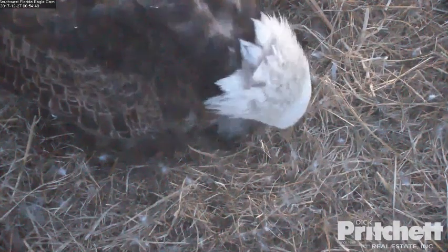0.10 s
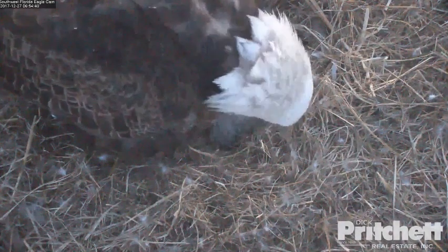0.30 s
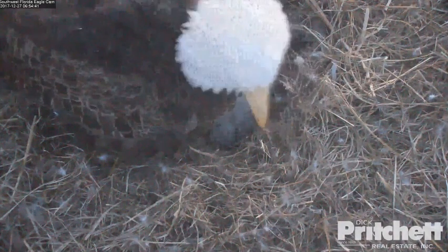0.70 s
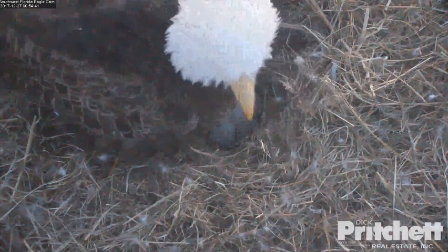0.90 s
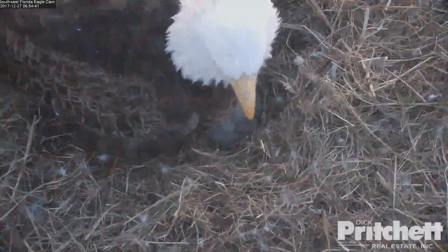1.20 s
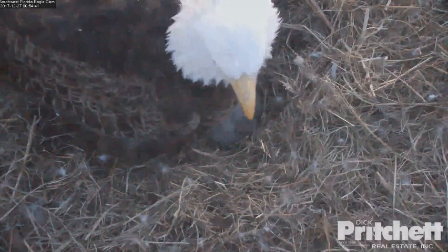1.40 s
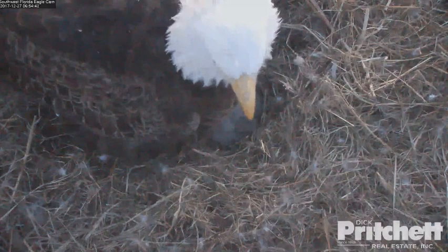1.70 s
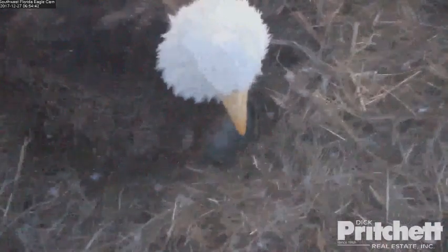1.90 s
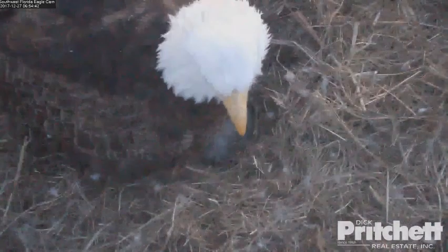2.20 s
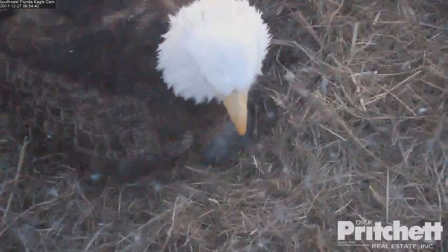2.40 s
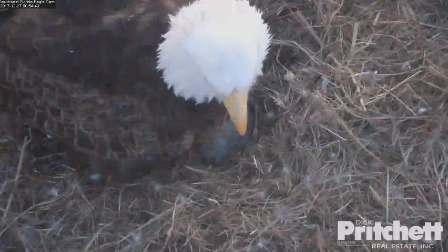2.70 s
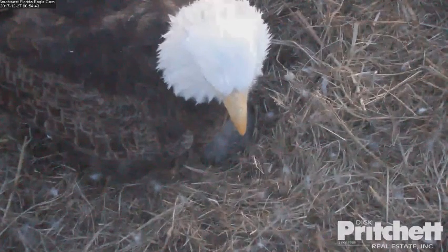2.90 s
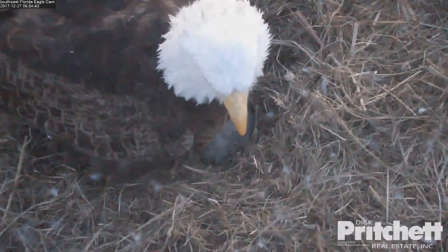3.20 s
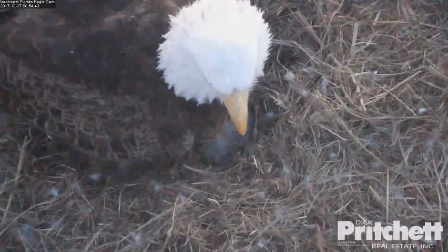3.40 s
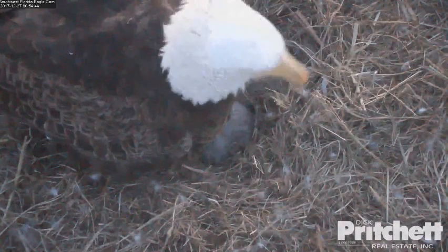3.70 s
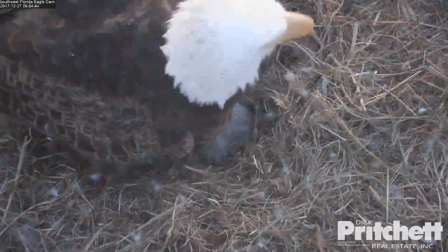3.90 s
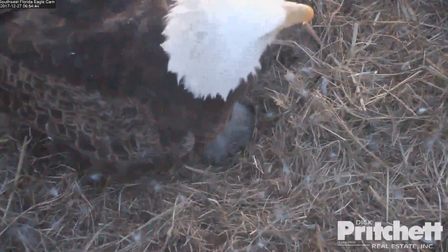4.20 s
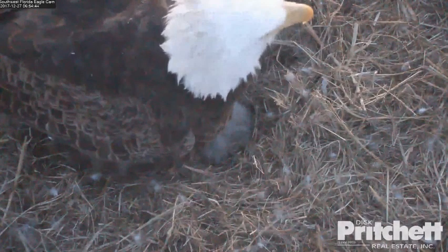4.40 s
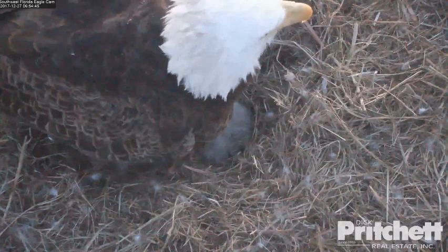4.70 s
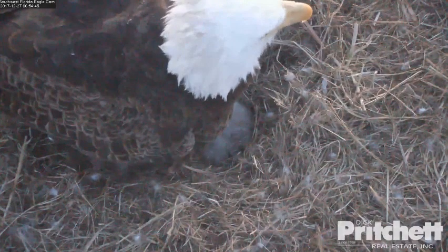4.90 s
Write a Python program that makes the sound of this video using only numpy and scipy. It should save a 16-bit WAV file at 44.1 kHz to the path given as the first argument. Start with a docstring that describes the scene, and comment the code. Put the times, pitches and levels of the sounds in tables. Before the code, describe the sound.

Outdoors, close dry crackling begins at once as a heavy bird turns in its straw bedding, loudest and slightly overloaded in the opening half second. After about one second it thins to separate ticks, creaks and snaps with short crackly tails and faint body thuds. Far traffic hisses softly throughout, with weak wavering engine tones. A cheap small microphone gives a nasal ring and little high treble.

```python
"""From the start an eagle shoves itself round on a nest of dry grass (random clicks ringing through
resonances), in bursts that are over soon after 1 s; soft thuds (low noise) come and go to the end.
Then it settles: stalks go on creaking and snapping (click bursts), and the bedding crackles as it leans.
Behind it all a far road hisses and roars (shaped noise); engines hum (wavering tones), one rising late.
The small camera microphone rings near 3 kHz, overloads on loud crackles and passes little above 8 kHz."""
import sys
import numpy as np
from scipy import signal
from scipy.fft import rfft, irfft
from scipy.io import wavfile
from scipy.ndimage import uniform_filter1d

SR = 44100
rng = np.random.default_rng(int(sys.argv[2]) if len(sys.argv) > 2 else 0)


def store_wav(level_fs):
    """Save 16-bit WAV to argv[1]."""
    pcm = np.round(np.clip(np.atleast_2d(level_fs), -1, 1) * 32767)
    wavfile.write(sys.argv[1], SR, pcm.T.astype(np.int16))


N = 220884
TIME = np.arange(N) / SR

# Spectrum of the road, shared by hiss and roar: f/Hz, relative level/dB
ROAD_SPECTRUM = [(20, -31), (60, -22), (300, -16.5), (450, -16), (650, -8), (1000, -12), (1190, -9.5),
                 (1370, 0), (1750, -1.5), (2230, -8), (2720, 1.5), (3250, -10.5), (4100, -24), (5100, -38),
                 (7500, -58)]
# Swell of the tyre hiss as traffic flows, before the trim in road(): t/s, level/dB
TRAFFIC_FLOW = [(0.35, -50), (0.75, -52), (1.38, -54.5), (1.92, -50.5), (2.5, -50.4), (2.95, -51),
                (3.4, -50.5), (4.2, -52), (4.7, -53), (5, -51.5)]
# Three far engines, before the trim in engine(): t/s, f/Hz (mean pitch), level/dB
LOW_ENGINE_CURVE = [(0.4, 102, -77.5), (0.82, 104.5, -76), (1.7, 96.1, -83), (2.65, 92.5, -77),
                    (2.95, 92.2, -96), (3.3, 91.7, -97), (3.6, 90.9, -78), (4.05, 89.6, -80.5)]
RISING_ENGINE_CURVE = [(2.75, 155.7, -86), (4.95, 172.2, -78)]
WHINE_CURVE = [(0.1, 332, -79), (0.65, 342.8, -81), (1.0, 344, -77), (1.8, 341.9, -74), (2.05, 349, -81.5),
               (2.9, 341.6, -75.5), (4.1, 338.3, -73), (4.4, 334.7, -80), (5, 341.7, -79.5)]
# Resonances of the camera housing, heard in every crackle: f/Hz, width/Hz, level/dB
HOUSING_RESONANCES = [(1450, 390, -8.5), (1780, 400, -8.5), (2628, 388, 1.5), (2878, 111, 2.5),
                      (2974, 43, 6.5), (3270, 46.7, 3), (3385, 220, -6.5), (3940, 207, -5.5),
                      (4140, 190, -7.5), (4760, 38, -22), (5700, 300, -42.5)]
# The nest gives under the bird's weight: t/s, half length/s, level/dB
WEIGHT_THUDS = [(0.168, 0.064, -79), (0.306, 0.024, -64.5), (1.616, 0.064, -74.5), (1.98, 0.057, -79),
                (2.678, 0.038, -70.5), (3.201, 0.076, -76.5), (4.57, 0.034, -69.5), (4.664, 0.037, -74.5)]
# The bird leans on the bedding: t/s, half length/s, crackle level/dB
BEDDING_LEANS = [(0.91, 0.043, -51), (1.7, 0.094, -48.5), (1.94, 0.037, -53.5), (2.42, 0.04, -61),
                 (2.645, 0.016, -53), (3.26, 0.07, -51), (4.95, 0.15, -57.5)]
# Single stalks break, before the trims in snaps(): t/s, level/dB, stalk ring f/Hz, brittle top level/dB
STALK_SNAPS = [(0.032, -39.5, 2800, -4), (0.086, -42.5, 2870, -10), (0.111, -39, 2750, -16),
               (0.265, -46.5, 2700, 3), (0.302, -47.5, 2600, -17), (0.485, -41.5, 2800, -15),
               (0.584, -59, 2880, -18), (0.625, -42, 2820, -16), (0.641, -47.5, 2620, 3),
               (0.832, -49, 2750, -7), (0.85, -47, 2800, -15), (1.057, -46, 2890, -19),
               (1.081, -44.5, 2650, -11), (1.198, -47.5, 2700, -21), (1.445, -48.5, 2700, -3),
               (1.597, -46.5, 2640, -1), (1.609, -49, 2700, 1.5), (1.76, -39, 2870, -3),
               (1.769, -48, 2740, 4.5), (1.786, -45.5, 2870, -24), (1.801, -48, 3070, -22),
               (2.118, -47.5, 2995, -10), (2.144, -44, 2860, -16), (2.15, -49, 2660, -13),
               (2.246, -47.5, 2970, -8.5), (2.375, -48, 2980, -11), (2.438, -55, 2980, -9),
               (2.494, -47, 2930, -5), (2.535, -50, 2760, -16), (2.605, -47.5, 2890, -17),
               (2.749, -49, 3000, 2), (2.891, -42, 2800, -14), (3.005, -41, 3130, -19),
               (3.136, -46.5, 2760, -3.5), (3.162, -50.5, 2510, 2.5), (3.37, -42.5, 3020, -9),
               (3.497, -44.3, 2580, -2), (3.506, -50, 3180, -12), (3.652, -44, 2500, -9),
               (3.663, -45.5, 2620, -3.5), (3.821, -46.5, 2560, -7.5), (3.849, -50, 3130, -10),
               (3.988, -43, 2420, -13), (4.014, -50, 2970, -24), (4.15, -52.5, 2900, 1),
               (4.362, -51, 2403, -5), (4.511, -44.5, 2740, -13.5)]
# The bird shoves itself round: peak t/s, rustle level/dB, crunch level/dB, build-up/(dB/s), decay/(dB/s)
BODY_SHOVES = [(0.189, -36.8, -49.5, 104, 194), (0.32, -35, -56, 400, 54.5),
               (0.495, -41.5, -58, 302, 100.5), (1.095, -48.5, -62, 151, 300)]

# The roar ebbs to its lowest level at the dip, rising evenly away from it on both sides
ROAR_DB, ROAR_DIP_S, ROAR_SWELL_DB_PER_S = -62.5, 1.8, 0.9
RESTING_DB = -64.5  # crackle under the bird's weight alone
LOOSENED_DB, SETTLE_S = -7, 0.075  # crackle after a snap: level against the snap's listed level, decay
# A snap of the reference level splinters this long; the time doubles with every further step in dB
SPLINTER_S, SPLINTER_DB, SPLINTER_DOUBLES_DB = 0.014, -48, 23
FAINT_COUNT, FAINT_DB, FAINT_RING_HZ = 16, -52.5, (2500, 2940)  # mean level, before the trim in snaps()
CRUNCH_DEPTH = 1.35  # the crunch swings this many dB per dB of rustle
OVERLOAD_DB, ELECTRONICS_DB = -34.3, -95  # microphone ceiling, noise floor before the last filter
CAMERA_RATE, CAMERA_TOP_HZ, CUTOFF_HZ = 16000, 7380, 15800  # sample rate in Hz, two low-pass corners


def from_db(db):
    """Decibels to gain."""
    return 10 ** (np.asarray(db) / 20)


def rms_one(x):
    """Scale to rms 1."""
    return x / np.sqrt(np.mean(x ** 2) + 1e-20)


def evened(x, size=SR // 40):
    """Hold rms near 1 over 25 ms, so the push of the body, not chance, sets the loudness."""
    return x / np.sqrt(uniform_filter1d(x ** 2, size) + 1e-9)


def in_time(rows):
    """Draw each column of a curve out to every sample."""
    s, *columns = np.transpose(rows)
    return [np.interp(TIME, s, column) for column in columns]


def during(rows):
    """Gain 1 while a curve lasts, with 0.1 s fades outside both ends."""
    first, last = rows[0][0], rows[-1][0]
    return np.interp(TIME, [first - .1, first, last, last + .1], [0, 1, 1, 0])


def swells(rows):
    """Gain of smooth bell-shaped pushes that come and go."""
    return sum(from_db(db) * np.exp(-.5 * ((TIME - s) / half) ** 2) for s, half, db in rows)


def cut(x, hz, kind, order=2):
    """Butterworth filter."""
    sos = signal.butter(order, hz, kind, fs=SR, output="sos")
    return signal.sosfilt(sos, x + 1e-18)


def drift(rate):
    """Slow random drift with rms 1: white noise that falls off above the rate in Hz."""
    hz = np.fft.rfftfreq(N, 1 / SR)
    spectrum = rfft(rng.standard_normal(N)) / (1 + (hz / rate) ** 2)
    return rms_one(irfft(spectrum, N))


def coloured_noise(spectrum):
    """Steady noise with a given spectrum, rms 1."""
    points_hz, db = np.transpose(spectrum)
    hz = np.maximum(np.fft.rfftfreq(N, 1 / SR), 1)
    colour = from_db(np.interp(np.log(hz), np.log(points_hz), db))
    return rms_one(irfft(rfft(rng.standard_normal(N)) * colour, N))


def resonate(x, hz, width):
    """One two-pole resonance with gain about 1 at its peak."""
    r = np.exp(-np.pi * width / SR)
    feed = np.array([1, 0, -1]) * (1 - r * r) / 2
    back = [1, -2 * r * np.cos(2 * np.pi * hz / SR), r * r]
    return signal.lfilter(feed, back, x + 1e-18)


def road(split_hz=1150, hiss_db=3.0, sway_db=0.4):
    """Far tyres: a hiss above and a duller roar below swell separately; the hiss flutters slightly."""
    hiss_level, = in_time(TRAFFIC_FLOW)
    roar_level = ROAR_DB + ROAR_SWELL_DB_PER_S * np.abs(TIME - ROAR_DIP_S)
    hiss = rms_one(cut(coloured_noise(ROAD_SPECTRUM), split_hz, "high", order=8))
    roar = rms_one(cut(coloured_noise(ROAD_SPECTRUM), split_hz, "low", order=8))
    hiss_gain = from_db(hiss_level + hiss_db + sway_db * drift(16))
    return hiss_gain * hiss + from_db(roar_level) * roar


def engine(rows, gain_db, octave_db, waver_db=1.3, wobble_hz=0.82):
    """A far engine tone and its octave, wavering on the way through the air."""
    hz, level_db = in_time(rows)
    phase = 2 * np.pi * np.cumsum(hz + wobble_hz * drift(4.8)) / SR
    tone = rms_one(np.sin(phase) + from_db(octave_db) * np.sin(2 * phase))
    gain = from_db(level_db + gain_db + waver_db * drift(5.8))
    return during(rows) * gain * tone


def thuds(low_hz=40, high_hz=150):
    """Soft pushes of the body carried through the nest: swells of low noise."""
    rumble = rms_one(cut(rng.standard_normal(N), [low_hz, high_hz], "band"))
    return swells(WEIGHT_THUDS) * rumble


def housing(clicks, top_hz):
    """Clicks ring in the camera housing; the deeper in the nest they start, the lower their top."""
    rings = 0
    for k, (hz, width, db) in enumerate(HOUSING_RESONANCES):
        rings = rings + (-1) ** k * from_db(db) * resonate(clicks, hz, width)  # alternating polarity
    return cut(rings, top_hz, "low", order=4)


def fractures(per_s, spread_db, size):
    """Tiny breaks at random moments and of either sign: many weak, a few strong."""
    born = rng.random(size) < per_s / SR
    sign = rng.choice([-1, 1], size)
    return born * sign * from_db(spread_db * np.minimum(rng.exponential(1, size), 4))


def unrest():
    """Gain of the bedding's crackle: the resting weight, the leans, the settling after listed snaps."""
    settling = 0
    for s, db, *_ in STALK_SNAPS:
        decay = np.exp(-np.abs(TIME - s) / SETTLE_S)
        settling = settling + (TIME >= s) * (from_db(db + LOOSENED_DB) * decay) ** 2
    return np.sqrt(from_db(RESTING_DB) ** 2 + swells(BEDDING_LEANS) ** 2 + settling)


def stir(top_hz=4250, slip_s=.018):
    """Muffled crackle of the bedding: each small slip starts at once and dies away."""
    slips = np.abs(fractures(per_s=32, spread_db=1.5, size=N))
    surge = .5 + signal.lfilter([1], [1, -np.exp(-1 / (slip_s * SR))], slips + 1e-18)
    # limit the surge, so that the crackle stays even and no random slip stands out
    clicks = np.tanh(surge / 1.8) * fractures(per_s=2000, spread_db=2.2, size=N)
    return unrest() * rms_one(cut(housing(clicks, top_hz), 1.4 * top_hz, "low"))


def faint_snaps(spread_db=2.0, top_db=-10):
    """More stalks give way weakly at random moments, in the columns of STALK_SNAPS."""
    return [(rng.uniform(0, N / SR), rng.normal(FAINT_DB, spread_db), rng.uniform(*FAINT_RING_HZ), top_db)
            for _ in range(FAINT_COUNT)]


def snaps(top_hz=4350, stalk_width=130, stalk_db=4, brittle_hz=3500, brittle_db=-2,
          scatter_db=-18, scatter_s=0.06, gain_db=-1.35):
    """A stalk cracks and splinters for milliseconds; the sticks around scatter a short tail."""
    size, head = SR // 6, SR // 100  # whole snap, and the first 10 ms that set its level
    age, out = np.arange(size) / SR, np.zeros(N + size)
    for s, level_db, stalk_hz, bright_db in STALK_SNAPS + faint_snaps():
        lasts = SPLINTER_S * 2 ** ((level_db - SPLINTER_DB) / SPLINTER_DOUBLES_DB)
        clicks = fractures(per_s=3000, spread_db=2.0, size=size)
        clicks *= np.exp(-age / lasts) + from_db(scatter_db) * np.exp(-age / scatter_s)
        clicks[0] = 7.0  # the first break is by far the strongest
        stalk = from_db(stalk_db) * resonate(clicks, stalk_hz, stalk_width)
        body = housing(clicks + stalk, top_hz)
        # thin, dry stalks break brighter
        top = cut(housing(clicks, top_hz), brittle_hz, "high", order=6)
        snap = body / body[:head].std() + from_db(bright_db + brittle_db) * top / top[:head].std()
        start = max(round(s * SR), 0)
        out[start:start + size] += from_db(level_db + gain_db) * snap
    return out[:N]


def shoving():
    """Gains of rustle and crunch: each shove builds to its peak and dies away, the crunch more steeply."""
    rustle = crunch = 0
    for s, rustle_db, crunch_db, rise, fall in BODY_SHOVES:
        eased = np.maximum(rise * (s - TIME), fall * (TIME - s))  # dB below the peak
        rustle = rustle + from_db(rustle_db - eased) ** 2
        crunch = crunch + from_db(crunch_db - CRUNCH_DEPTH * eased) ** 2
    return np.sqrt(rustle), np.sqrt(crunch)


def shuffle(top_hz=4250, crunch_hz=1350, crunch_low_hz=380):
    """Feathers drag over many stalks at once; the crushed layers below add a duller crunch."""
    rustle_gain, crunch_gain = shoving()
    rustle = evened(housing(fractures(per_s=1900, spread_db=3.0, size=N), top_hz))
    crushing = fractures(per_s=4000, spread_db=2.0, size=N)
    dulled = cut(crushing, crunch_hz, "low", order=2)
    crunch = rms_one(cut(dulled, crunch_low_hz, "high", order=1))
    return rustle_gain * rustle + crunch_gain * crunch


def scene():
    """The road far off, the nest close by."""
    engines = engine(LOW_ENGINE_CURVE, gain_db=0.3, octave_db=-22.0)
    engines = engines + engine(RISING_ENGINE_CURVE, gain_db=2.5, octave_db=-2.5)
    engines = engines + engine(WHINE_CURVE, gain_db=1.5, octave_db=-27)
    nest = thuds() + stir() + snaps() + shuffle()
    return (road() + engines + nest)[None]


def record(dry):
    """The camera overloads at its low sample rate, so overtones of loud crackles fold back below 8 kHz."""
    top, knee = from_db(OVERLOAD_DB), 8  # a high knee bends late and hard
    sampled = signal.resample_poly(dry, CAMERA_RATE, SR, axis=1)
    squashed = sampled / (1 + np.abs(sampled / top) ** knee) ** (1 / knee)
    played = signal.resample_poly(squashed, SR, CAMERA_RATE, axis=1)[:, :N]
    steep = signal.butter(18, CAMERA_TOP_HZ, fs=SR, output="sos")
    played = signal.sosfiltfilt(steep, played, padtype="constant")
    electronics = from_db(ELECTRONICS_DB) * rng.standard_normal(N)
    return cut(played + electronics, CUTOFF_HZ, "low", order=24)


dry = scene()
out = record(dry)
store_wav(out)
```